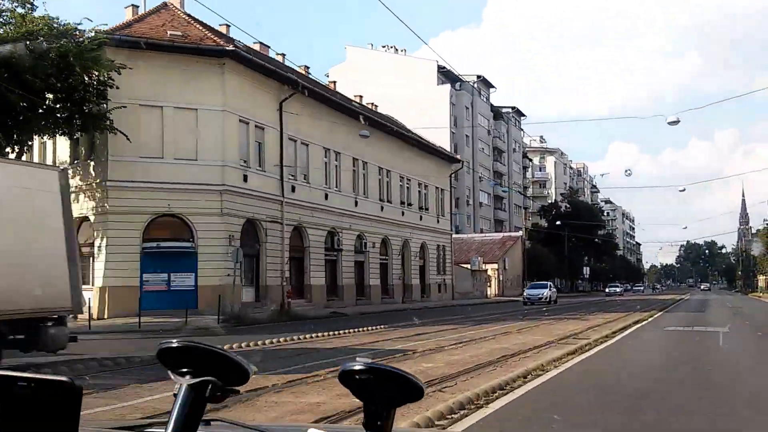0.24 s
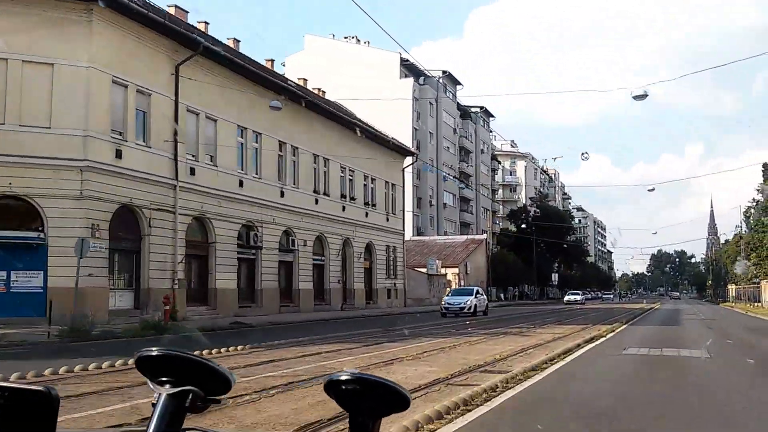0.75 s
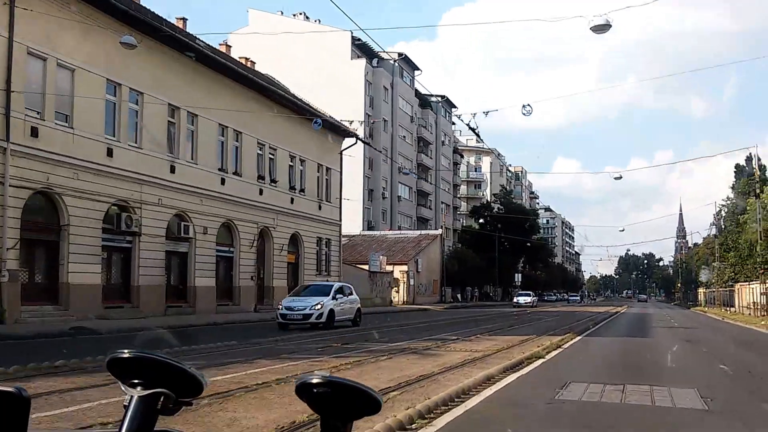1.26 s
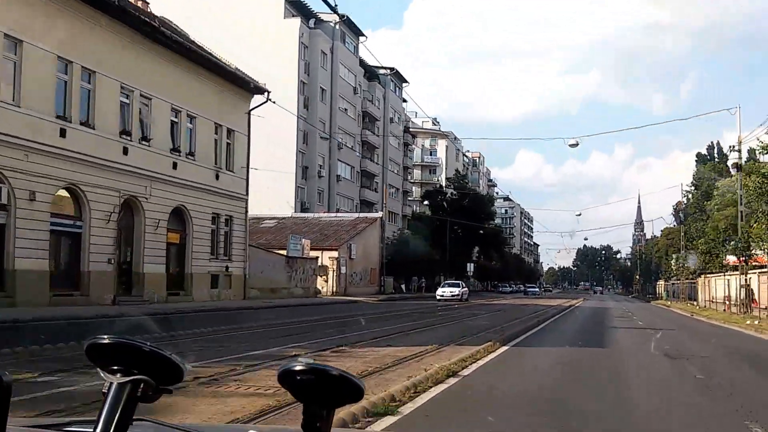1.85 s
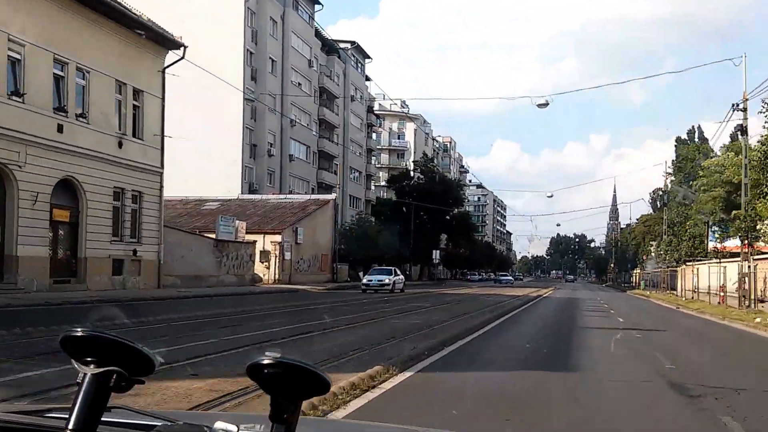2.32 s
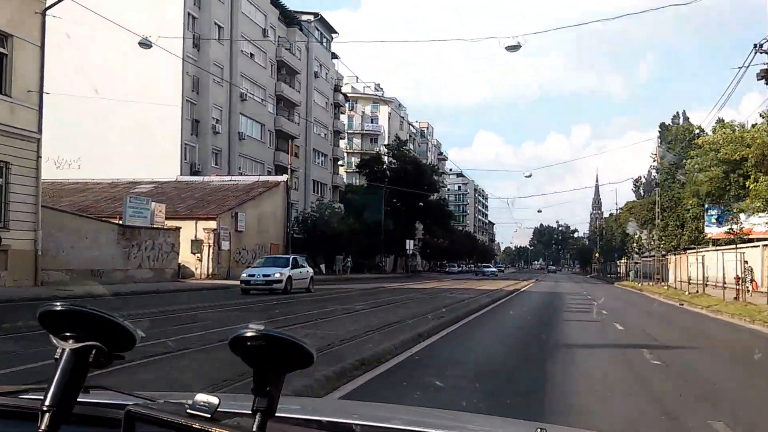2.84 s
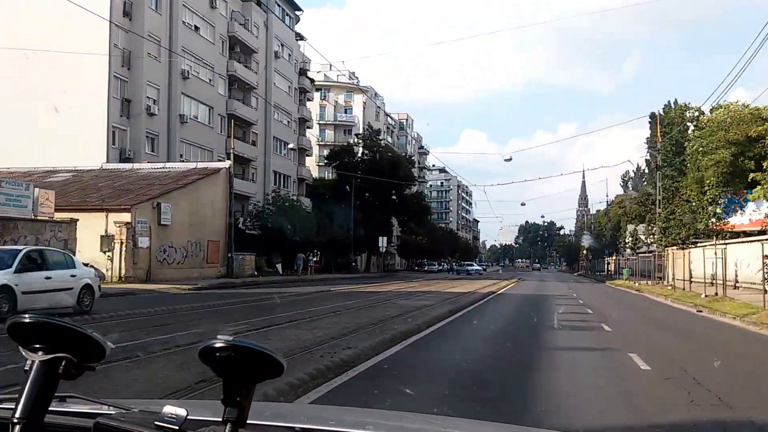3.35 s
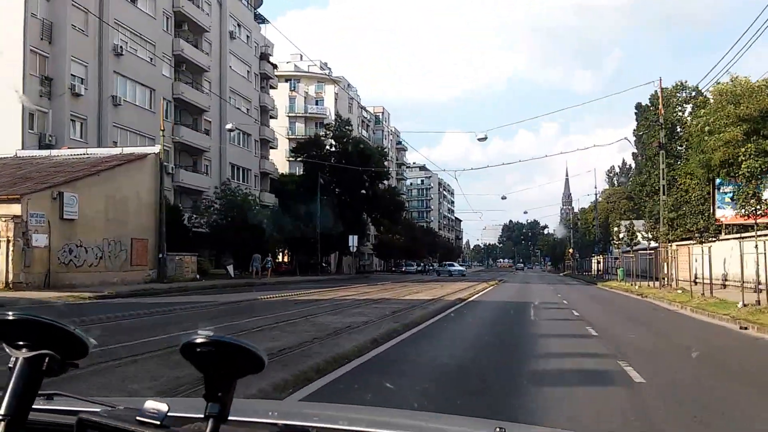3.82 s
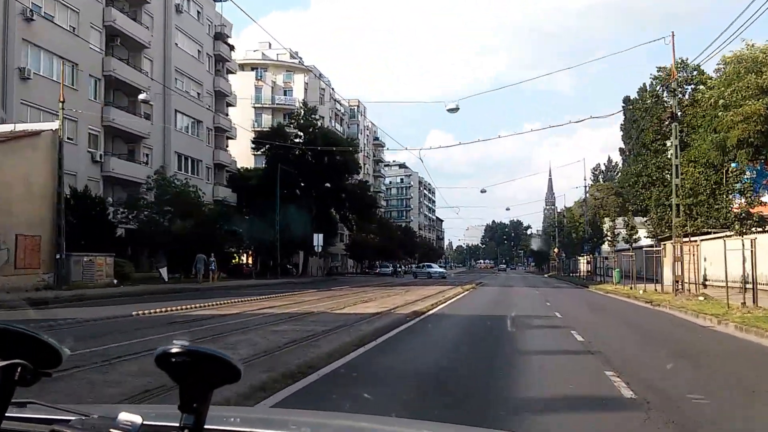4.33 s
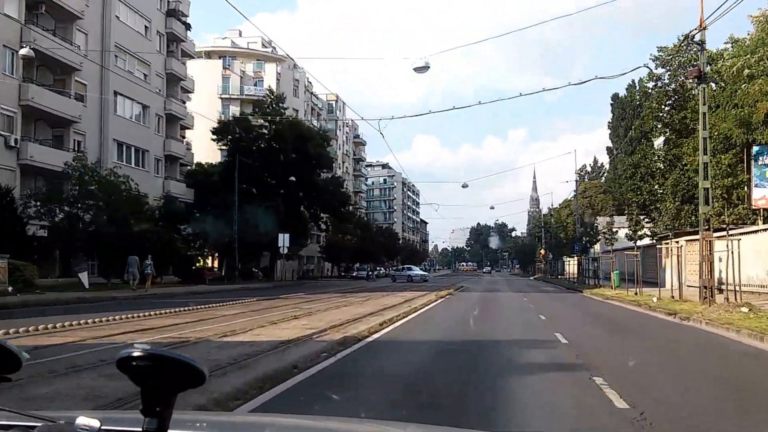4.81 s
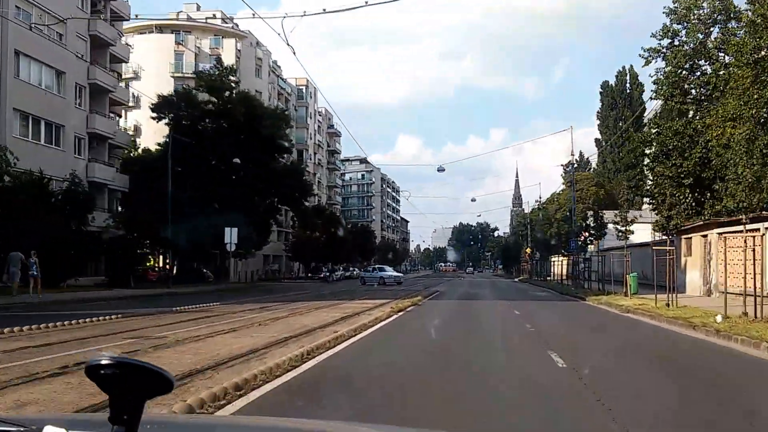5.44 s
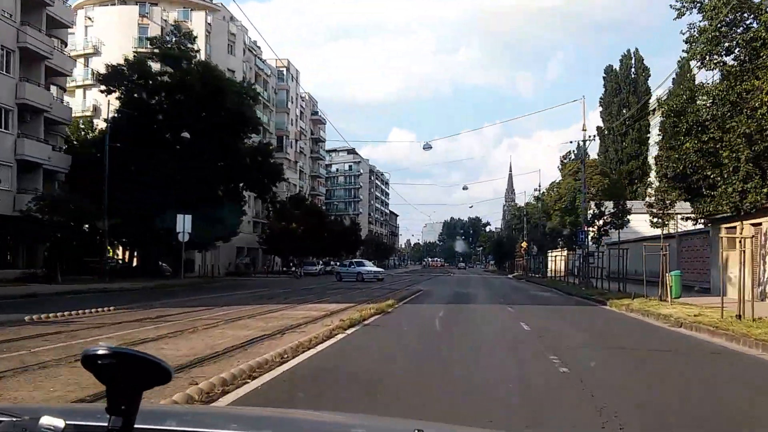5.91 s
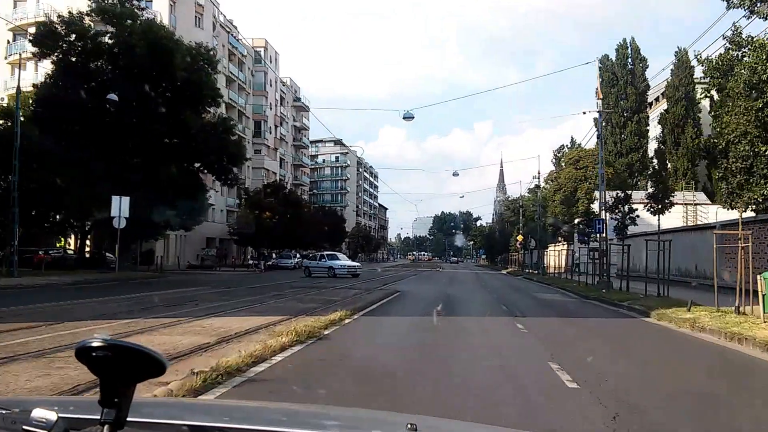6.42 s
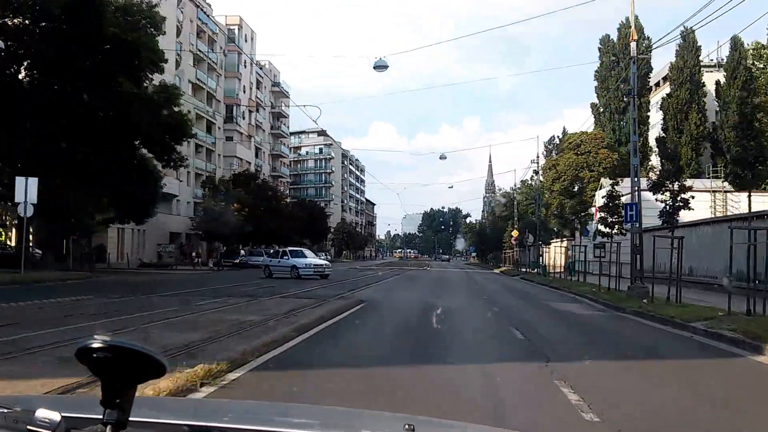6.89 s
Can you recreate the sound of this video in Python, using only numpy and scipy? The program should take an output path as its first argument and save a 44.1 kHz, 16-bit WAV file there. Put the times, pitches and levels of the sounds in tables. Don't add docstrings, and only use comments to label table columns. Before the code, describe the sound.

Heard inside a car driving steadily along a city street, with a small microphone near the dashboard. A low engine hum runs throughout, with muffled tyre roar, faint gear whine and deep irregular booming from bumps; a cluster of soft thumps comes within the first 0.7 seconds. At about 1.9 seconds a hard suspension knock and sharp click open a rough patch: until about 2.6 seconds dull thuds, bright plastic ticks, buzzing and fine trim sizzle crowd together over heavy rumble. From 3 to 5 seconds the road is calmer, with small bumps, an isolated tick near 3.5 and light panel hums. The engine pitch climbs slightly from about 5 seconds and tyre roar thickens. From 6.4 ticks return, clustering around 6.8 as trim rattles; the gear whine drops away and the engine hum swells loud and boomy until the end at about 7.2. Faint hiss lies underneath.

```python
import sys
import numpy as np
from scipy import signal
from scipy.fft import rfft, irfft, next_fast_len
from scipy.io import wavfile
from scipy.ndimage import uniform_filter1d, map_coordinates

SR = 44100
rng = np.random.default_rng(int(sys.argv[2]) if len(sys.argv) > 2 else 0)


def store_pcm(level_fs):
    pcm = np.round(np.clip(level_fs, -1, 1) * 32767).astype(np.int16)
    wavfile.write(sys.argv[1], SR, np.atleast_2d(pcm).T)


def voltage_ratio(level):
    return 10 ** (np.asarray(level, float) / 20)


N = 315756


def unit(x):
    return x / np.sqrt(np.mean(x ** 2) + 1e-20)


def curves(rows):
    s, *cols = np.transpose(rows)
    return [np.interp(np.arange(N) / SR, s, c) for c in cols]


def slow(level):
    t = np.arange(0, N + 64, 64) / SR
    return np.interp(np.arange(N) / SR, t, level(t))


def wobble(rate):
    knots = rng.standard_normal(int(N * rate / SR) + 4)
    return slow(lambda t: map_coordinates(knots, [t * rate]))


def with_swells(base_db, swells):
    def swell_power(t):
        return sum(voltage_ratio(db) ** 2 * np.exp(-2 * ((t - s) / half) ** 2) for s, db, half in swells)
    return 10 * np.log10(voltage_ratio(base_db) ** 2 + slow(swell_power))


def white():
    return rng.standard_normal(N)


def patchy(depth_db, tall, long, size=512):
    z = signal.stft(white(), nperseg=size)[2]
    field = rng.standard_normal(z.shape)
    field = uniform_filter1d(uniform_filter1d(field, tall, 0), long, 1)
    return signal.istft(z * voltage_ratio(depth_db * unit(field)), nperseg=size)[1][:N]


def steadied(x, share, seconds):
    swell = np.abs(uniform_filter1d(x * x, int(seconds * SR))) + 1e-9
    return unit(x / swell ** (np.clip(share, 0, 1) / 2))


def filtered(x, response):
    m = next_fast_len(len(x) + min(len(x), 8192))
    return irfft(rfft(x, m) * response(np.fft.rfftfreq(m, 1 / SR)), m)[:len(x)]


def shape(points):
    f, v = np.transpose(points)
    return lambda hz: voltage_ratio(np.interp(np.log(hz + 1), np.log(f + 1), v))


def modes(table):
    def response(f):
        total = 0
        for k, (c, w, db) in enumerate(table):
            total = total + (-1) ** k * voltage_ratio(db) * 1j * f * w / (c * c - f * f + 1j * f * w)
        return total
    return response


# f/Hz, width/Hz, lift/dB
PANELS = [(277.5, 5.6, 5), (317.3, 9.4, 2.5), (427, 14, 1.5), (422, 49, 2), (479.4, 80, -6), (540, 29, 0.5),
          (622, 29, 4), (650, 57, -9), (683, 29, 5.5), (786, 46, 0), (954, 49, 3), (1380, 67, 4.5),
          (1590, 70, 3.5), (1790, 30, 3), (1930, 100, 4), (2230, 90, -0.5), (2400, 330, -3.5),
          (2910, 170, 7), (4410, 56, -2)]


def panels(hz):
    return voltage_ratio(sum(db / (1 + ((hz - c) / (w / 2)) ** 2) for c, w, db in PANELS))


# t/s, firing f/Hz, firing tone level/dB, load level/dB
ENGINE = [(0, 77.24, -26.5, -4.5), (.5, 77.1, -27, -2), (1, 78.5, -34, -2.5), (1.5, 79.23, -22, -3),
          (2, 79.84, -24, -5.5), (2.5, 80.6, -28, -8.5), (3, 80.73, -28.5, -6), (3.5, 81.2, -27, -4.5),
          (4.5, 82.75, -27, -3.5), (4.85, 82.9, -26.5, -4), (5.2, 84.4, -25.5, 0.3), (5.5, 85.3, -27, 1.3),
          (5.8, 86.34, -19.5, -0.7), (6.25, 88.08, -20.5, 0.2), (6.58, 88.96, -26.5, 1.5),
          (6.8, 89.52, -18.5, 1), (7, 90.56, -13.5, 0.8), (7.16, 91.52, -14, 2.5)]
# multiple of the firing rate, level/dB
ORDERS = [(2, 7.5), (3, -2), (3.5, -6.5), (4, -2), (4.9, -7), (6, -14.5), (7, -8), (7.5, -16.5)]


def engine():
    hz, tone_db, load_db = curves(ENGINE)
    turn = 2 * np.pi * np.cumsum(hz) / SR
    tone = voltage_ratio(tone_db + 0.75 * wobble(8.9)) * np.sin(turn + 0.28 * wobble(11))

    upper = sum(voltage_ratio(db - 1 + 3.5 * wobble(5)) * np.sin(k * turn + 1.0 * wobble(6)) for k, db in ORDERS)
    upper_db = -40 + load_db

    teeth = 4.42
    slack_db = 76 * np.maximum(np.arange(N) / SR - 6.75, 0)
    whine = voltage_ratio(4.5 * wobble(7) - 1.5 - slack_db) * np.sin(teeth * turn + 1.1 * wobble(14))
    fifth = voltage_ratio(-7 + 3.5 * wobble(6)) * np.sin(3 / 2 * teeth * turn + 1.0 * wobble(7))
    whine_db = -39 + 2.86 * load_db

    through_panels = filtered(voltage_ratio(upper_db) * upper + voltage_ratio(whine_db) * (whine + fifth), panels)
    return np.sqrt(2) * (tone + through_panels)


# t/s, level/dB
ROAD = [(0, -20), (.6, -20.5), (.85, -24), (1.2, -17.5), (1.45, -18), (1.75, -28), (2.1, -17),
        (2.45, -18.5), (2.75, -29), (3.1, -30), (3.35, -40), (4.2, -21.5), (4.4, -32), (5.4, -30.5),
        (6.1, -26.5), (6.6, -24), (7.16, -25)]
# f/Hz, width/Hz, level/dB
BOUNCE = [(31.5, 10.6, -0.5), (42.2, 9.5, 1.5), (54.7, 28, -4)]
# f/Hz, width/Hz, level/dB
DRUM = [(100.8, 9.5, 3), (137.4, 10, 1.5), (162.5, 21.3, -4.5), (178, 50, -13.5), (87.6, 12.7, -6)]
# t/s, body heave level/dB, floor thump level/dB, half length/s
BUMPS = [(0.139, -16, -14, 0.032), (0.237, -30, -13.5, 0.027), (0.276, -10.5, -24, 0.028),
         (0.328, -40, -11.5, 0.024), (0.488, -20, -18.5, 0.032), (0.684, -35, -17, 0.096),
         (0.983, -29, -14, 0.01), (1.192, -13, -16.5, 0.029), (1.33, -19, -40, 0.023),
         (1.394, -24, -17.5, 0.025), (1.83, -14, -19, 0.047), (1.969, -7.5, -15, 0.029),
         (2.082, -12, -12, 0.076), (2.217, -9, -16, 0.053), (2.316, -13, -10.5, 0.03),
         (2.377, -10.5, -13, 0.041), (2.543, -14.5, -17, 0.057), (2.776, -37, -20, 0.026),
         (2.906, -9.5, -45, 0.02), (3.135, -17, -42, 0.12), (3.47, -23, -24, 0.092),
         (3.641, -18.5, -15.5, 0.03), (3.746, -22, -26, 0.033), (4.302, -30, -17, 0.038),
         (5.47, -23.5, -25, 0.03), (5.763, -16.5, -24, 0.033), (5.92, -27, -14, 0.012),
         (6.39, -18, -12.5, 0.096), (6.48, -13.5, -22, 0.013), (6.83, -24, -16.5, 0.081),
         (1.25, -30, -19, .04), (1.72, -33, -22, 0.051), (2.46, -22, -22, 0.023),
               (2.62, -32, -21, 0.033), (2.66, -22, -20, 0.019), (3.86, -23, -30, 0.021),
               (4.12, -36, -28, .04), (4.5, -26, -30, 0.064), (4.91, -40, -27, 0.08),
               (5.04, -24, -24, 0.038), (5.12, -30, -18.5, 0.024), (5.62, -22, -38, .035),
               (6.03, -24, -20.5, 0.018), (6.14, -35, -19, 0.048), (6.62, -33, -23, .04),
               (6.94, -22, -15, 0.028), (7.02, -12, -14.5, 0.037), (7.11, -22, -16, 0.025)]


def road():
    rough_db, = curves(ROAD)
    bumps = BUMPS
    bounce_db = with_swells(rough_db + 0.5, [(s, db, half) for s, db, _, half in bumps])
    mean_drum_db = -25.5 + 0.53 * (rough_db - rough_db.mean())
    drum_db = with_swells(mean_drum_db, [(s, db, half) for s, _, db, half in bumps])

    def steep(hz, top_hz):
        return 1 / np.sqrt(1 + (hz / top_hz) ** 8)

    bounce = filtered(white(), lambda hz: modes(BOUNCE)(hz) * steep(hz, top_hz=65.2))
    drum = filtered(white(), lambda hz: modes(DRUM)(hz) * steep(hz, top_hz=200) * hz / (hz + 60))
    bounce = steadied(bounce, share=1.0, seconds=0.14)
    drum = steadied(drum, share=0.38, seconds=0.07)
    return voltage_ratio(bounce_db) * bounce + voltage_ratio(drum_db) * drum


# f/Hz, level/dB per Hz
ROAR = [(110, -8.5), (190, 3), (230, -1.5), (310, -1), (400, -3.5), (500, -5), (600, -14.5), (720, -22),
        (940, -41.5), (1580, -120)]
# f/Hz, level/dB per Hz
HISS = [(380, -7), (640, -4), (807, -1.5), (959, 0.5), (1150, -6.5), (1580, -12), (2250, -18.5),
        (2490, -16), (2740, -29.5), (2960, -28.5), (5000, -40.5), (6500, -61), (11000, -120)]
# t/s, low roar level/dB, high roar level/dB
SEAMS = [(.08, -30, -47), (.16, -48, -43), (.225, -37, -33), (.645, -36, -37), (1.06, -43, -45),
         (1.44, -27.5, -38), (1.51, -44, -36), (1.7, -40, -29), (1.96, -34, -55), (2.12, -38, -38),
         (2.17, -40, -38), (2.24, -40, -38), (2.3, -38, -39), (3.2, -47, -34.5), (3.34, -48, -36),
         (4.3, -40, -35), (5.4, -42, -33), (5.63, -30, -31.5), (5.92, -30, -30), (6.3, -40, -34),
         (6.625, -42, -30), (6.715, -30, -32), (6.85, -27, -44), (7.0, -29, -48)]
# t/s, level/dB, half length/s
COARSE_STRETCHES = [
    (1.4, -47, 0.11),
    (3.013, -48, 0.084),
    (5.197, -60, .1),
    (1.995, -47, 0.12),
    (2.172, -43, 0.04),
    (2.33, -63, 0.049),
    (2.473, -57, 0.039),
    (6.3, -45, .05),
]


def tyres():
    load_db, rough_db = curves(ENGINE)[-1], curves(ROAD)[0]
    seam_s = 0.012
    low_db = -31 + 0.83 * load_db + 0.24 * (rough_db - rough_db.mean())
    low_db = with_swells(low_db, [(s, db, seam_s) for s, db, _ in SEAMS])
    high_db = with_swells(-39.5 + 1.04 * load_db, [(s, db, seam_s) for s, _, db in SEAMS])
    hiss_db = with_swells(-41.5 + 0.41 * load_db, COARSE_STRETCHES)

    tread = patchy(1.6, tall=2, long=4, size=2048)
    tread = filtered(tread, lambda hz: shape(ROAR)(hz) * panels(hz))
    high = filtered(tread, lambda hz: 1 / (1 + (460 / (hz + 1)) ** 12))
    low = tread - high
    hiss = patchy(1.5, tall=3, long=5, size=1024)
    hiss = unit(filtered(hiss, lambda hz: shape(HISS)(hz) * panels(hz)))

    lumps_db = 1.0 * wobble(7) + 1.4 * wobble(18)
    low_roar = voltage_ratio(low_db + lumps_db + 0.22 * wobble(13.0)) * unit(low)
    high_roar = voltage_ratio(high_db + 0.46 * lumps_db + 1.6 * wobble(11)) * unit(high)
    return low_roar + high_roar + voltage_ratio(hiss_db + 1.0 * wobble(14)) * hiss


# t/s, level/dB, f/Hz, time to fall 60 dB/s
KNOCKS = [(1.937, -44, 3160, 0.054), (1.945, -10, 180, 0.11), (1.945, -21.5, 263, 0.17),
          (1.987, -40, 2370, 0.037), (2.0, -25, 228, .11), (2.02, -58, 2400, .25), (2.03, -38, 1012, 0.09),
          (2.07, -29, 1046, 0.028), (2.09, -30, 454, 0.069), (2.1, -25, 259.5, 0.2), (2.1, -31, 760, 0.11),
          (2.102, -34.5, 1075, 0.066), (2.152, -31, 366, 0.1), (2.165, -47, 2780, .06),
          (2.225, -37, 487, 0.11), (2.23, -37, 705, 0.056), (2.272, -51, 3400, .065),
          (2.286, -25, 480, 0.069), (2.285, -36, 825, 0.056), (2.33, -24, 200, 0.34), (2.4, -23, 250, .072),
          (2.487, -32, 936, 0.052), (2.52, -31, 472, 0.11), (2.645, -33, 565, .08),
          (2.931, -64.5, 2970, 0.45), (3.622, -31, 175, 0.22)]


def knocks():
    out, t = np.zeros(N + SR), np.arange(SR // 4) / SR
    for s, db, hz, t60 in KNOCKS:
        rough = map_coordinates(rng.standard_normal(512), [t * (40 + hz / 4)])
        fade = voltage_ratio(db - 60 * t / t60)
        soft_start = 1 - np.exp(-t * (60 + hz / 8))
        ring = 3 * np.sin(2 * np.pi * hz * t + (0.94 + hz / 4000) * rough)
        out[round(s * SR):][:len(t)] += fade * soft_start * ring
    return out[:N]


# t/s, level/dB
SHAKE = [(0, -62.5), (.75, -72), (1.3, -57.5), (1.76, -62.5), (1.92, -56), (2.11, -49), (2.35, -45.5),
         (2.47, -47.5), (2.6, -52), (2.8, -58), (3.35, -62.5), (4.7, -68.5), (5.6, -62.5), (6.45, -57.5),
         (6.83, -46), (6.93, -49.5), (7.14, -44)]
# t/s, lift/dB, dying time/s
FLURRIES = [(.03, -1, 0.11), (.25, 7.5, 0.15), (.635, 1, 0.052), (1.83, 2, .05), (1.94, 9, 0.12),
            (2.085, -4, .06), (2.17, 4, 0.11), (2.305, -15, 0.022), (3.4, -5, .05), (3.47, 4.5, 0.37),
            (4.05, 3.5, 0.22), (4.5, 3, .12), (4.79, 7, .07), (5.03, 7, 0.1), (5.265, 6, 0.052),
            (5.478, 5.5, .08), (5.785, 3, 0.07), (6.175, 4, .05)]
# f/Hz, level/dB per Hz
SIZZLE = [(3530, -44), (6000, -24), (9900, -9.5), (12200, -1.5), (12800, -2.5), (15600, -15)]
# f/Hz, width/Hz, level/dB
BUZZ = [(2400, 630, 13.5), (3400, 2500, 7), (4450, 340, 10), (4940, 2100, -3.5), (6300, 640, -13)]
# t/s, level/dB, half length/s
BUZZ_FITS = [(1.965, -55, 0.04), (2.037, -55, .04), (2.11, -61, .05), (2.2, -55, 0.045),
             (2.273, -54, 0.048), (2.34, -58, .035), (2.387, -55.5, 0.069), (2.465, -53, .04),
             (2.53, -56, 0.027), (2.62, -62, .04), (6.75, -61, .04), (6.83, -61, .035)]


def sizzle():
    fine_db, = curves(SHAKE)
    hz = curves(ENGINE)[0]
    buzz_db = with_swells(-69 + 0.23 * (fine_db + 63) + 0.5 * (hz - hz.mean()), BUZZ_FITS)

    def burst(t, dies):
        return (1 - np.exp(-t / 0.0067)) * np.exp(-t / dies)

    lift_db = slow(lambda t: sum(db * burst(np.maximum(t - s, 0), dies) for s, db, dies in FLURRIES))
    jitter_db = 0.8 * wobble(20) + 1.2 * wobble(300)
    flurry = voltage_ratio(lift_db + jitter_db)

    def plastic(hz):
        return modes(BUZZ)(hz) * (hz / 3000) ** 2 / (1 + (hz / 3000) ** 2 + (hz / 5500) ** 5)

    fine = unit(filtered(patchy(0.77, tall=8, long=5), shape(SIZZLE)))
    rustle = faint_rustle()
    buzz = unit(filtered(patchy(2.3, tall=5, long=5), plastic))
    hard = np.clip((fine_db + 65.5) / 13, 0.15, 0.9)
    contacts = np.sqrt(hard) * fine + np.sqrt(1 - hard) * rustle
    return flurry * (voltage_ratio(fine_db + 1.5) * contacts + voltage_ratio(buzz_db - 1.5) * buzz)


# t/s, peak level/dB, plastic level/dB, plastic f/Hz
TICKS = [(1.921, -51.5, 5, 3700), (1.936, -9.5, -29.5, 6500), (1.9552, -43, -3, 4900),
         (1.9897, -22.5, -14.5, 4940), (2.007, -35, -16, 4980), (2.0385, -37.5, -12, 4430),
         (2.0594, -39, -15, 4630), (2.0814, -48, -14, 4304), (2.1036, -36, -17.5, 4650),
         (2.164, -20.5, -26, 5490), (2.175, -23, -19, 4590), (2.1914, -27, -24, 5680),
         (2.2696, -28.5, -19, 4900), (2.2767, -29, -20, 4800), (2.2994, -43, -25, 5350),
         (2.3744, -36, -11.5, 4734), (2.3944, -38, -21, 4770), (2.4395, -35, -10, 4870),
         (2.456, -21.5, -25, 5186), (2.5114, -36, -16, 4613), (2.538, -25.5, -28, 7100),
         (2.5944, -40, -19, 4450)]
# t/s, peak level/dB, plastic level/dB, plastic f/Hz
STRAY_TICKS = [(.3147, -43, -32, 4320), (.6355, -43, -23, 6660), (3.473, -38, -21, 4410),
               (4.7894, -45, -23, 4470), (5.2659, -41, -25, 4300), (5.2713, -37, -19, 4840),
               (5.482, -36, -14, 5700), (6.1779, -41, -24, 4390), (6.454, -34, -14, 6997),
               (6.55, -38, -19, 4370), (6.727, -40, -10, 5003), (6.7431, -33, -23, 5860),
               (6.752, -29, -18, 6086), (6.7674, -33, -16, 4460), (6.8165, -27.5, -21, 6200),
               (6.832, -37.5, -17, 5600), (6.845, -35, -18, 5600), (6.8644, -45, -24, 4670)]
# level/dB over the rough patch, level/dB elsewhere
DASH_DB = (-10, -14)


def ticks():
    out, t = np.zeros(N + SR), np.arange(SR // 12) / SR
    rows = [(*row, DASH_DB[0]) for row in TICKS] + [(*row, DASH_DB[1]) for row in STRAY_TICKS]
    for s, db, plastic_db, plastic_hz, dash_db in rows:
        hz = 12100 - 45 * (db + 43)
        hz = hz * (1 + 0.03 * rng.standard_normal())
        chatter = rng.standard_normal((2, len(t))) * (1 - np.exp(-t / 0.00033))
        ring = modes([(hz, 1200, 0), (12300, 3000, -4), (8500, 3000, -9)])
        broad = modes([(11000, 9000, 0)])
        bright = unit(filtered(chatter[0], lambda f: ring(f) * broad(f)))
        plastic = modes([(plastic_hz, 800, 0), (2450, 400, dash_db - 8),
                         (3400, 500, dash_db - 21.0), (6500, 2500, -10)])
        dull = unit(filtered(chatter[1], plastic))
        fade = voltage_ratio(db - 11.5 - 60 * t / 0.059)
        crack = 1 + 0.66 * voltage_ratio(-60 * t / 0.011)
        out[round(s * SR):][:len(t)] += fade * crack * (bright + voltage_ratio(plastic_db + 11) * dull)
    return filtered(out[:N], lambda hz: (1j * hz / (1800 + 1j * hz)) ** 2)


def hum(table, base_db, swells):
    noise = filtered(white(), lambda hz: modes(table)(hz) ** 2)
    return voltage_ratio(with_swells(base_db, swells)) * steadied(noise, share=0.7, seconds=0.033)


# t/s, level/dB, half length/s
SHELF_HUMS = [(1.3, -47, .06), (1.55, -48, 0.086), (2.765, -44, 0.058), (3.0, -56, 0.04),
              (3.15, -40.5, .03), (3.22, -45, 0.032), (3.36, -41.5, 0.027), (3.8, -46, .06),
              (4.09, -45, 0.055), (4.853, -44, 0.059), (5.4, -45.5, 0.099), (6.147, -48, 0.087),
              (6.32, -42, 0.04), (6.796, -49, 0.047)]


def shelf():
    return hum([(946, 67, 0)], -56.5, SHELF_HUMS)


# f/Hz, width/Hz, level/dB
DOOR_MODES = [(601.2, 50, 0)]
# t/s, level/dB, half length/s
DOOR_HUMS = [(1.2, -42, .04), (1.47, -37, .04), (1.72, -41, 0.098), (2.55, -49, 0.038), (3.19, -48, .03),
             (3.33, -40, 0.03), (4.2, -47, 0.092), (4.65, -43, 0.087), (5.2, -45, 0.13), (5.6, -42, .15),
             (5.85, -37.5, 0.11), (6.3, -40, 0.086), (6.55, -38.5, 0.08), (6.9, -36, .12),
             (7.13, -41, 0.044)]


def door():
    return hum(DOOR_MODES, -49, DOOR_HUMS)


# f/Hz, width/Hz, level/dB
GLASS_MODES = [(1582, 106, 0), (1789, 81, -2.5), (1974, 80, -4.5)]
# t/s, level/dB, half length/s
GLASS_HUMS = [(.42, -57, .05), (1.15, -54, 0.062), (1.4, -53, .06), (2.7, -62, .06), (3.0, -52, 0.14),
              (3.6, -54, 0.16), (3.85, -55, 0.078), (4.1, -53, .06), (4.45, -52.5, 0.099), (5.2, -50, .1),
              (6.2, -62, 0.075), (6.75, -56, .1)]


def windscreen():
    return hum(GLASS_MODES, -64.5, GLASS_HUMS)


def bracket():
    band = modes([(4450, 150, 0)])
    buzz = unit(filtered(white(), lambda hz: band(hz) ** 2))
    return voltage_ratio(-79.5 + 1.4 * curves(ENGINE)[-1] + 2.5 * wobble(9)) * buzz


# f/Hz, level/dB per Hz
SELF_NOISE = [(2060, -42), (3500, -12), (6150, -5), (7560, 0), (9240, 1.5), (10200, 1.5), (12400, 5.5),
              (13700, -4), (15600, -5.5)]


def faint_rustle():
    return unit(filtered(white(), shape(SELF_NOISE)))


def scene():
    cabin = engine() + road() + tyres() + knocks() + sizzle() + ticks()
    cabin = cabin + shelf() + door() + windscreen() + bracket()
    return filtered(cabin, lambda hz: hz ** 2 / (hz ** 2 + 16 ** 2) + 0.0056)[None]


def top_cut(x):
    return signal.sosfilt(signal.butter(12, 15780, fs=SR, output="sos"), x)


def record(dry):
    hiss = voltage_ratio(-60.0) * faint_rustle()
    whistle = voltage_ratio(-78) * np.sin(2 * np.pi * 15688 * np.arange(N) / SR)
    soft = dry[0] / (1 + np.abs(dry[0] / 0.9) ** 6) ** (1 / 6)
    mix = filtered(soft + hiss + whistle, lambda hz: hz < 15730)[None]
    return top_cut(mix)


dry = scene()
out = record(dry)
store_pcm(out)
```